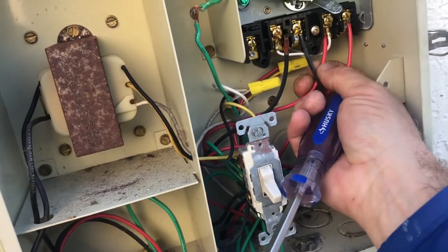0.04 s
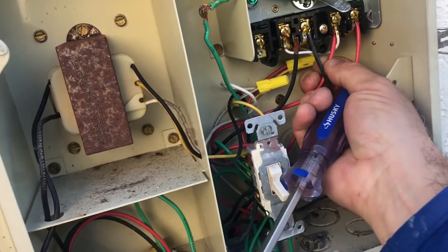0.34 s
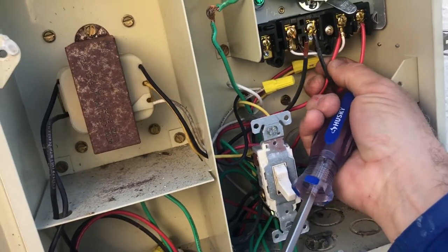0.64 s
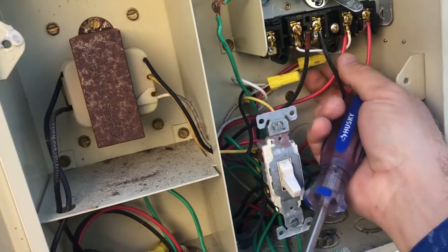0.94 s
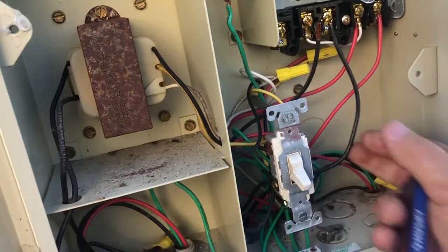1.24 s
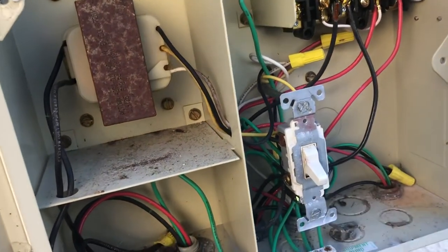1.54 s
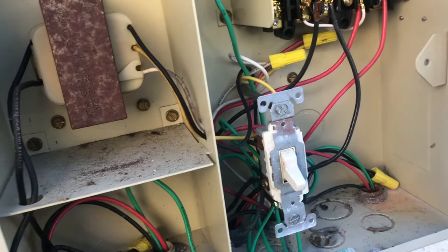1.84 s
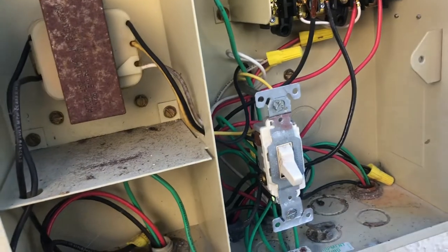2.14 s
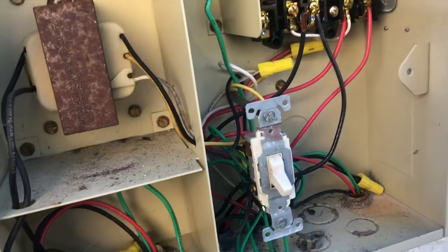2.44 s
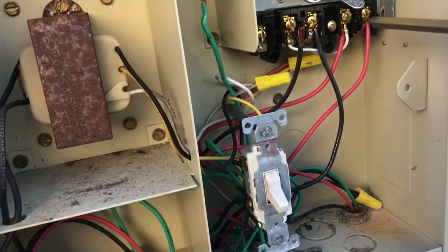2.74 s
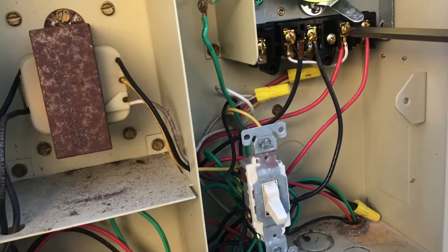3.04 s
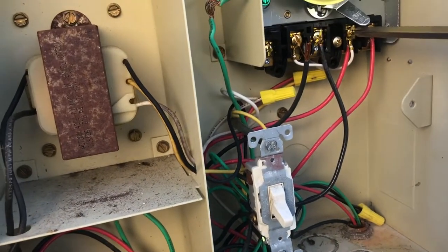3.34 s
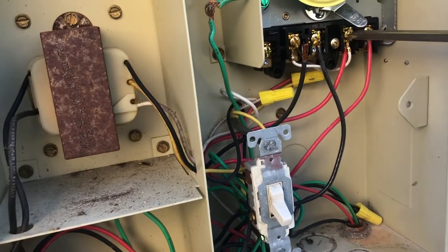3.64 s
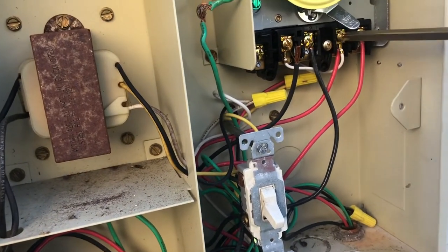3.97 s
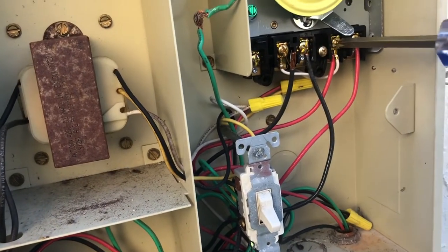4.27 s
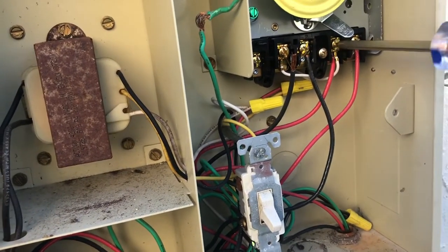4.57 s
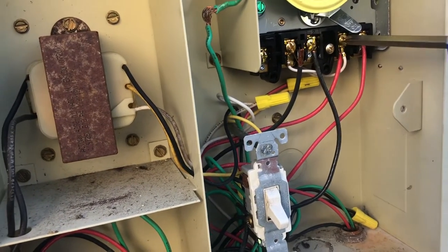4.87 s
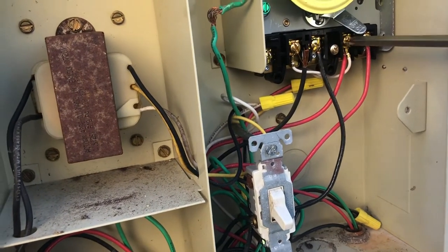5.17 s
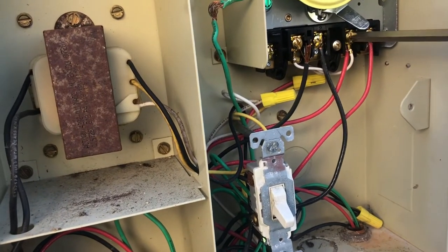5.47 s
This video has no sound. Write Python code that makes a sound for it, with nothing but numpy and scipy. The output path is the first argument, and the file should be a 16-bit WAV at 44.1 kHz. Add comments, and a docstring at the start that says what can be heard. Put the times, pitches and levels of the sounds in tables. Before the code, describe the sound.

A low, slightly wavering mains and motor hum runs throughout, outdoors, over distant traffic that swells softly at the start and around 2 to 3 seconds. Close by, a screwdriver and wires tick against terminals in an open sheet steel box. Light clicks come near 0.3 and 0.75 seconds, then a sharp, somewhat damped clack at 0.9, surrounded by brief scrapes and thin, faint squeals. Two smaller clicks follow around 1.25 seconds. A far bird gives two faint falling chirps at about 1.5 seconds, and the tool goes mostly quiet. Tapping resumes at 3.1 seconds, with a hard slip at 3.5 that makes the box ring briefly, low and hollow. Light ticks and short rasps continue from 4 to 5 seconds. Another hard slip and scrape lands at 5.2, followed by a few soft ticks near 5.5 seconds.

```python
"""A mains and motor hum over distant traffic; then, close by, a screwdriver clicks on wire terminals.
The blade slips, scrapes and squeals on the screws in an open sheet-steel electrical box, outdoors.
Each contact ticks in the small steel parts, then the box panels bloom, damped at first by a hand
on the wires. The far traffic noise swells now and then, and a bird gives two faint chirps."""
import sys
import numpy as np
from scipy import signal
from scipy.fft import rfft, irfft, next_fast_len
from scipy.io import wavfile
from scipy.ndimage import uniform_filter1d

SR = 44100
rng = np.random.default_rng(int(sys.argv[2]) if len(sys.argv) > 2 else 0)


def transcribe(u):
    """Save the signal u as a 16-bit wav file named by the first command-line argument.

    u: samples, shape (n,) or (channels, n), limited to [-1, 1]; the rate is SR.
    q: integer samples, one column per channel.
    """
    v = np.clip(np.atleast_2d(u).T, -1, 1)
    q = np.round(v * 32767).astype(np.int16)
    wavfile.write(sys.argv[1], SR, q)


N = 247401
T = np.arange(N) / SR
AGE = T[:SR // 2]  # seconds since a blow


def undb(db):
    """Decibels to gain."""
    return 10 ** (np.asarray(db) / 20)


def unit(x):
    """Scale to rms 1."""
    return x / np.sqrt(np.mean(x ** 2) + 1e-30)


def shape(x, gain):
    """Filter by a gain that is a function of frequency."""
    size = next_fast_len(len(x) + 4096)
    hz = np.arange(size // 2 + 1) * SR / size + 1e-3
    return irfft(rfft(x, size) * gain(hz), size)[:len(x)]


def contour(points, hz):
    """Gain of an EQ curve at given frequencies."""
    points_hz, db = np.transpose(points)
    return undb(np.interp(np.log(hz), np.log(points_hz), db))


def band(x, lo, hi):
    """Causal band-pass, edges in Hz."""
    return signal.sosfilt(signal.butter(3, [lo, hi], "band", fs=SR, output="sos"), x)


def tilt(x, db_per_octave):
    """Brighten or dull the treble: a harder or softer contact."""
    return shape(x, lambda f: undb(db_per_octave * np.log2(np.clip(f, 3000, 13000) / 3000)))


def narrow(hz, width_hz):
    """Noise in one bell-shaped band; around 0 Hz it is a random wobble."""
    return unit(shape(rng.standard_normal(N), lambda f: np.exp(-2 * ((f - hz) / width_hz) ** 2)))


def add(out, start_s, x):
    """Mix a sound in at a time."""
    i = int(start_s * SR)
    out[i:i + len(x)] += x[:N - i]


def fade(t60_s):
    """Exponential decay after a blow."""
    return undb(-60 * AGE / t60_s)


def bloom(rise_s):
    """Build-up of a vibration as it spreads through the metal."""
    return 1 - np.exp(-(AGE / rise_s) ** 2)


def struck(x, db):
    """Set the level of the loudest 10 ms of a blow."""
    return x * undb(db) / np.sqrt(uniform_filter1d(x ** 2, SR // 100).max())


def ring(modes, decay_scale=1):
    """Damped modes; the contact point and the pressing hand vary their strength and tuning a little."""
    hz, db, t60_s = np.transpose(modes)[:, :, None]
    strength, detune, phase = rng.standard_normal((3, len(modes), 1))
    tones = np.sin(2 * np.pi * (hz * (1 + .008 * detune) * AGE + phase))
    return np.sum(undb(db + 2 * strength) * fade(decay_scale * t60_s) * tones, axis=0)


# The low drone of mains and motor: pitch_hz, level_db, waver_ratio
HUM_TONES = [(57.8, -48, 1), (60.27, -44, 0.4), (68.4, -49, 0), (73.96, -50.5, 1), (78.85, -46, 0.3),
             (121.8, -65.5, 1), (147.5, -73.5, 0.25), (159.3, -54.5, 0.17)]


def hum():
    """Mains and motor tones that waver and beat against each other."""
    out = 0
    for hz, db, waver in HUM_TONES:
        swing = 1 + waver * (narrow(0, 1.2) + 1j * narrow(0, 1.2))  # drifts in level and phase
        tone = np.exp(2j * np.pi * (hz * T + rng.random()))
        out = out + undb(db) * unit(np.real(swing * tone))
    return out


# Brief and longer swells in the far traffic noise: middle_s, half_length_s, swell_db, centre_hz
SWELLS = [(0, 0.17, 7.5, 1540), (0.401, 0.07, 6.5, 1090), (1.9, 0.16, 5.5, 1060), (2.22, 0.21, 10, 2240),
          (2.25, 0.25, 2.5, 180), (2.97, .13, 9, 1890)]


def swells_db(band_hz, width_octaves=0.18):
    """Each swell lifts the noise bands near its own centre frequency, then sinks back."""
    lift_db = 0
    for middle_s, half_s, swell_db, hz in SWELLS:
        envelope = 1 / (1 + ((T - middle_s) / half_s) ** 2)
        overlap = 1 / (1 + (np.log2(band_hz / hz) / width_octaves) ** 2)
        lift_db = lift_db + swell_db * envelope * overlap
    return lift_db


# Tone colour of the outdoor air within each band: frequency_hz, gain_db
AIR_EQ = [(25, -41.5), (42, -10), (62, -5.5), (85, -8), (125, -8), (200, -14.5), (310, -21), (480, -30),
          (840, -29.5), (1080, -23), (1400, -32), (2250, -25), (3000, -41.5), (6500, -49.5), (16000, -59.5)]
# The traffic bed, low band to high: start_level_db, recede_ratio
TRAFFIC_BANDS = [(-54, 0), (-49, 0), (-59.5, 0.52), (-59.5, 0.52), (-62, 0.92), (-68.5, 0.66),
                 (-72.5, 0.35)]


def traffic(recede_db_per_s=1.19, flutter_db=0.77):
    """A bed of far traffic: the rumble stays while the upper bands slowly recede."""
    edges_hz = [20, 90, 350, 900, 1300, 1750, 2650, 20000]
    out = 0
    for lo, hi, (db, recede) in zip(edges_hz, edges_hz[1:], TRAFFIC_BANDS):
        level_db = db - recede * recede_db_per_s * T + flutter_db * narrow(0, 15)
        level_db += swells_db(np.sqrt(lo * hi))
        noise = shape(rng.standard_normal(N), lambda f: contour(AIR_EQ, f) * (f >= lo) * (f < hi))
        out = out + undb(level_db) * unit(noise)
    return out


# The box with and without a hand on its wires: decay_ratio, low_cut_hz, rub_send_db
HELD, FREE = (0.71, 283, 13.8), (0.94, 172, 9.4)


def grip(time_s, let_go_s=1.15):
    """Until it lets go, the hand on the wires damps the box and carries more rubbing into it."""
    return HELD if time_s < let_go_s else FREE


def chatter(length_s, count=9):
    """A run of micro-impacts that grows until the blade snaps free."""
    force = np.zeros(len(AGE))
    progress = (np.arange(count) + .9 * rng.random(count)) / count
    force[(progress * length_s * SR).astype(int)] = (1 + progress) * rng.choice([-1, 1], count)
    return force


# Tone colour of the dense clatter in a blow: frequency_hz, gain_db
CLATTER_EQ = [(150, 1.5), (300, 0.5), (640, -5.5), (820, -7), (1500, -4), (2300, -12), (4500, -11.5),
              (9000, -13.5), (16000, -25.5)]


def clatter(decay_scale):
    """Countless small resonances: slow bending waves make the lows come late and stay."""
    out = 0
    for hz in 125 * 2 ** np.arange(0, 7.1, .5):  # half-octave bands
        khz = hz / 1000
        body = fade(decay_scale * 0.067 * khz ** -.3)
        tail = undb(-15.5) * khz ** -.95 * fade(decay_scale * 0.45 * khz ** -.15)
        attack = bloom(0.0021 * khz ** -1.1)
        grain = unit(band(rng.standard_normal(len(AGE)), hz / 2 ** .25, hz * 2 ** .25))
        out = out + np.sqrt(hz) * unit(grain * (body + tail) * attack)
    return unit(shape(out, lambda f: contour(CLATTER_EQ, f)))


# Bright modes of blade, screws and lugs: pitch_hz, level_db, t60_s
STEEL_MODES = [(3468, -11, 0.1), (3715, 9.5, 0.013), (4166, 2.5, 0.014), (4310, -28, 0.033),
               (5790, -15.5, 0.13), (5250, 16.5, 0.0166), (5940, 0, 0.036), (7180, 8, 0.0067),
               (8900, -32, 0.036), (8800, -6, 0.045), (8800, 9, 0.012), (10390, 5, 0.017)]


def steel_ring():
    """The small steel parts answer a tap with a short, high ping."""
    return ring(STEEL_MODES)


# Hollow modes of the box panels and brackets: pitch_hz, level_db, t60_s
BOX_MODES = [(194.4, -21, 0.39), (220, -2, 0.27), (354.4, -2.5, 0.27), (390.3, -9, 0.54), (435, -5.5, 0.31),
             (490, -5, 0.12), (580.6, -8.5, 0.31), (607.5, 7.5, 0.08), (684.7, 6, 0.094), (908, 2.5, 0.053),
             (1037, -3, 0.055), (1098, 12.5, 0.034), (1520, -41, 0.048), (1586, 3.5, 0.078),
             (1809, -12, 0.16), (2240, -17.5, 0.035), (2540, -24.5, 0.17), (2574, -2, 0.045),
             (3240, -8, 0.1)]


def box_ring(decay_scale=1):
    """The sheet steel answers a tap with a lower, longer ring."""
    return ring(BOX_MODES, decay_scale)


# Blade and wire hits: start_s, strength_db, hardness_db_per_octave, panel_send_db, knock_hz
CONTACTS = [(0.121, -64.5, 2, -4, 520), (0.141, -60.5, 4.5, 10, 517), (0.291, -43, 5, -3.5, 520),
            (0.305, -53.5, 0, 2, 570), (0.565, -70.5, 5, 7, 450), (0.751, -41, -6, 10, 686),
            (0.759, -49, 0, 4, 490), (0.832, -45, -9, 1, 650), (0.857, -65, 0, 2, 560),
            (0.871, -53.5, 0.5, -12, 660), (0.8921, -26, -3, -3.5, 685), (1.243, -45.5, -4.5, 3.5, 525),
            (1.265, -39.5, -3.5, -4.5, 517), (1.682, -54.5, -5.5, -18, 440), (3.1, -43.5, -3.5, 3.5, 520),
            (3.155, -51, -4.5, -3, 430), (3.452, -27.5, .5, 3.5, 540), (4.128, -55.5, -5, -4, 500),
            (4.253, -72.5, 4.5, 16, 492), (4.276, -49.5, -6, -2, 434), (4.405, -53, -10.5, 1, 530),
            (4.52, -46.5, -2, -0.5, 417), (4.79, -44, -5, 3, 465), (5.163, -45, -8.5, -4, 634),
            (5.1853, -27.5, -2, 0, 438), (5.468, -51, -6, 2, 593), (5.573, -52.5, -24, 13.5, 666)]


def clicks(knock_db=7, knock_octaves=0.39, panel_lag_s=0.00455):
    """Each contact rings the steel at once and the box just after; a harder one ticks louder, brighter."""
    out = np.zeros(N)
    for start_s, db, hardness, send_db, knock_hz in CONTACTS:
        decay_scale, low_cut_hz, _ = grip(start_s)
        chatter_s = 0.0038 * np.exp(0.15 * (db + 28.5))  # a firmer contact chatters longer
        dense = clatter(decay_scale)
        steel = signal.fftconvolve(chatter(chatter_s), dense + undb(-9) * unit(steel_ring()))
        box = dense + undb(-4) * unit(box_ring(decay_scale) * bloom(0.0048))
        # where the blow lands decides which panel modes take most of it
        panels = shape(box, lambda f: undb(knock_db * np.exp(-(np.log2(f / knock_hz) / knock_octaves)**2)))
        tick = band(tilt(steel[:len(AGE)], hardness), 3000, 20000)
        clack = band(box, 727, 2670)
        knock = band(panels, low_cut_hz, 900)
        add(out, start_s, struck(tick, db + 1.47 * hardness))
        add(out, start_s, struck(clack, db))
        # the panels get their push as the blade lets go, later after a longer chatter
        add(out, start_s + (chatter_s + panel_lag_s) / 2, struck(knock, db + send_db - .5))
    return out


def stick_slip(density=.35, catch_db=1.5, catch_hz=129.5):
    """Fluttering friction grains, thousands a second, surging as the blade catches on the screw head."""
    grains = rng.standard_normal(N) * (rng.random(N) < density)
    flutter = np.exp(.22 * narrow(0, 200))
    return grains * flutter * undb(catch_db * narrow(0, catch_hz))


# Tone colour of the rasp: frequency_hz, gain_db
RASP_EQ = [(900, -1), (1600, 2), (2500, 1), (3700, -1), (5000, -2), (9000, -4), (12000, -9), (16000, -11)]
# Rubbing strokes: middle_s, half_length_s, pressure_db, brightness_db_per_octave
STROKES = [(0.437, 0.02, -69, -11), (0.775, 0.041, -65.5, -0.5), (0.915, 0.03, -55, -2),
           (1.007, 0.011, -57.5, 3), (1.032, 0.029, -62.5, -1), (1.112, 0.015, -69, 10),
           (1.238, .016, -58, -5.5), (3.452, 0.0026, -52, -3), (3.65, 0.02, -70, 2.5),
           (3.72, 0.018, -72, 4), (3.98, 0.0093, -61, 2), (4.028, 0.039, -69, -0.5), (4.3, 0.014, -59, 0),
           (4.556, 0.027, -61, -3), (4.818, 0.01, -55, -3.5), (5.054, .011, -54.5, -2),
           (5.099, 0.015, -64, -2.5), (5.185, 0.0031, -51, -5), (5.203, .013, -44, -2.5),
           (5.333, .014, -57, -0.5), (5.549, .007, -69, -10), (5.602, 0.015, -69, 8)]


def scrapes(reference_db=-60.5, murmur_growth=0.59, murmur_loss=0.43, bite=0.99, taper=1.25):
    """The rubbing blade rasps in the screw; the duller the stroke, the more the panels murmur."""
    rub = stick_slip()
    rasp = unit(shape(band(rub, 1080, 18000), lambda f: contour(RASP_EQ, f)))
    steel = unit(signal.fftconvolve(rub, steel_ring())[:N])
    rasp = unit(rasp + undb(-10) * steel)
    box = unit(signal.fftconvolve(rub, box_ring())[:N])
    murmur = unit(box + 0.65 * unit(band(rub, 340, 1250)))
    out = np.zeros(N)
    for middle_s, half_s, db, brightness in STROKES:
        _, _, send_db = grip(middle_s)
        murmur_db = reference_db + send_db + murmur_growth * (db - reference_db) - murmur_loss * brightness
        near = np.abs(T - middle_s) < .15
        width_s = half_s * np.where(T[near] < middle_s, bite, taper)  # quick in, slower out
        stroke = np.exp(-((T[near] - middle_s) / width_s) ** 2 / 2)
        blade = undb(db) * unit(tilt(rasp[near], brightness))
        out[near] += stroke * (blade + undb(murmur_db) * murmur[near])
    return out


# Thin, rough squeals: middle_s, half_length_s, pitch_hz, width_hz, level_db
SQUEALS = [(.815, .05, 5100, 900, -67), (.828, .038, 9050, 450, -68.5), (.805, .028, 10500, 900, -73),
           (1.008, .018, 5050, 650, -58.5), (.432, .02, 4900, 1100, -66), (3.92, .1, 4300, 200, -80)]


def squeals():
    """Metal drags on metal, catching and letting go."""
    catch = unit(np.exp(.5 * narrow(0, 60)))
    return catch * sum(undb(db) * np.exp(-((T - middle_s) / half_s) ** 4) * narrow(hz, width_hz)
                       for middle_s, half_s, hz, width_hz, db in SQUEALS)


# Faint bird notes: start_s, length_s, start_hz, end_hz, level_db
BIRD_NOTES = [(1.43, 0.065, 5800, 3640, -64), (1.507, .06, 5280, 3700, -65)]


def bird():
    """A far bird: two falling notes, blurred with noise as if by their echoes."""
    out = 0
    for start_s, length_s, start_hz, end_hz, db in BIRD_NOTES:
        progress = np.clip((T - start_s) / length_s, 0, 1)
        phase = 2 * np.pi * np.cumsum(start_hz + (end_hz - start_hz) * progress) / SR
        arch = np.sqrt(np.abs(np.sin(np.pi * progress)))
        out = out + undb(db) * arch * narrow(0, 1700) * np.sin(phase)
    return out


# Pure tails on two hard slips: start_s, pitch_hz, level_db, t60_s
RING_TAILS = [(3.455, 10240, -68, .45), (3.457, 195, -28, .12), (5.187, 12850, -75, .4),
              (5.188, 205, -29, .17)]


def ring_tails():
    """After a hard slip a small steel piece rings on high, and the back wall of the box low."""
    out = np.zeros(N)
    for start_s, hz, db, t60_s in RING_TAILS:
        add(out, start_s, undb(db) * bloom(.004) * fade(t60_s) * np.sin(2 * np.pi * hz * AGE))
    return out


def scene():
    """Tool work close by; hum, street and bird behind, in mono."""
    tool = clicks() + scrapes() + squeals() + ring_tails()
    return (tool + hum() + traffic() + bird())[None]


def record(dry):
    """A steep high cut takes off the air above 16.2 kHz."""
    return signal.sosfilt(signal.ellip(10, .2, 80, 16200, fs=SR, output="sos"), dry)


dry = scene()
out = record(dry)
transcribe(out)
```